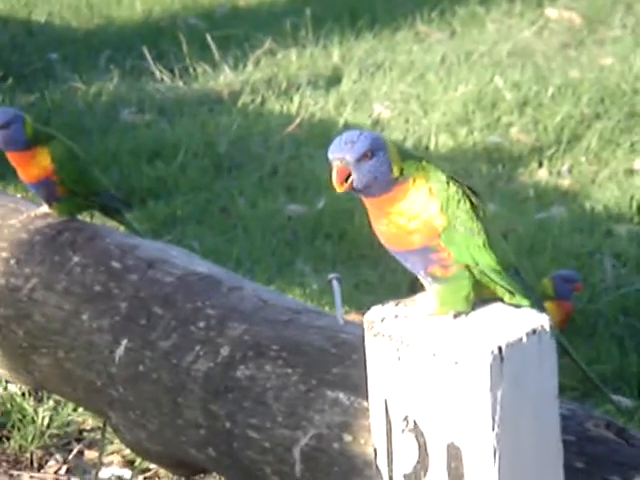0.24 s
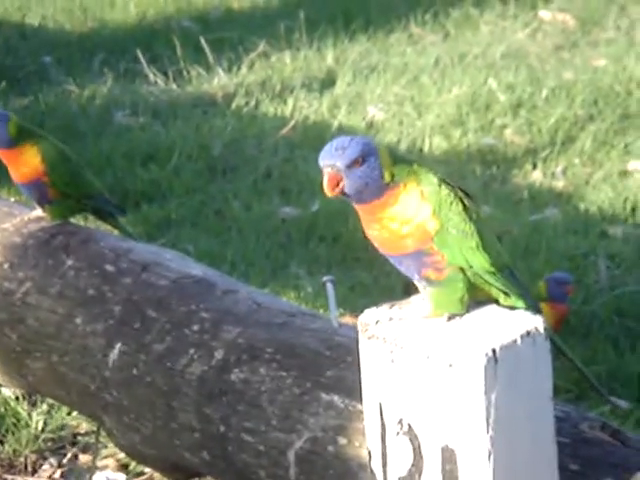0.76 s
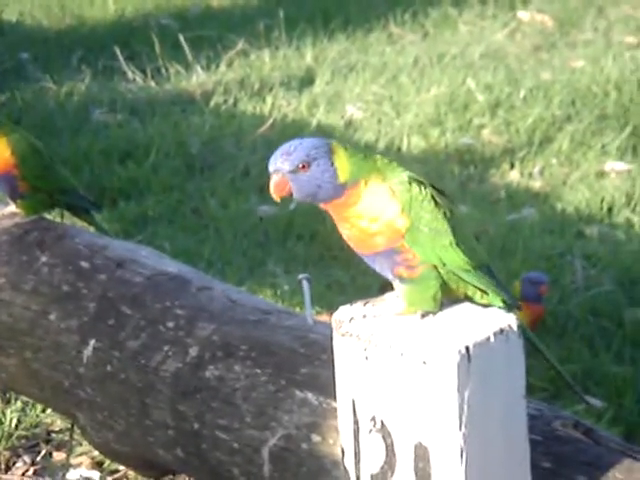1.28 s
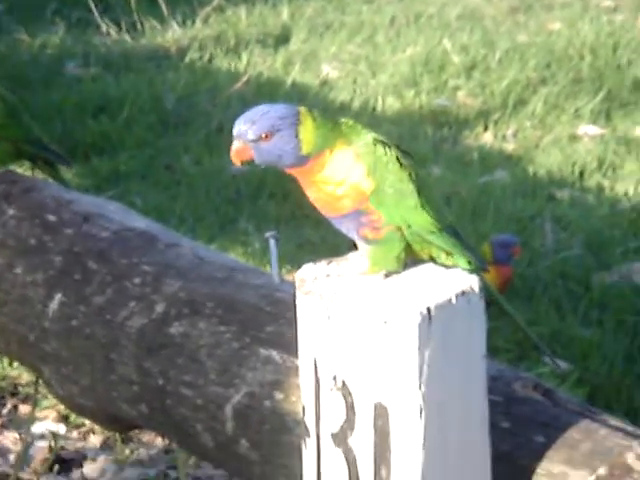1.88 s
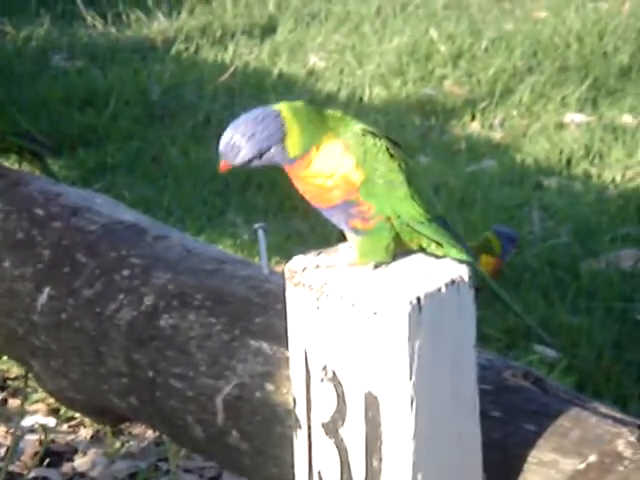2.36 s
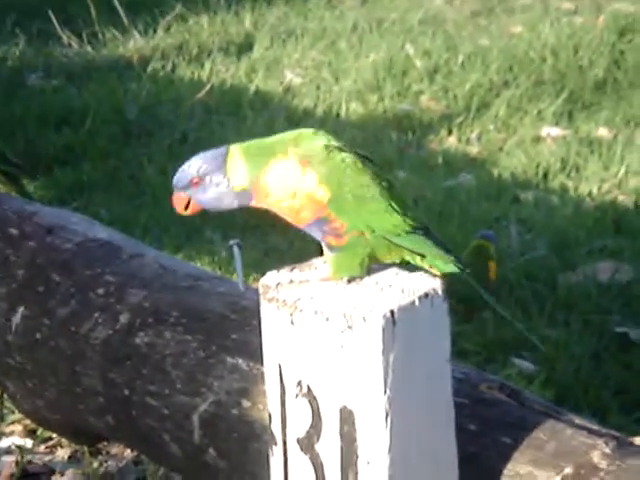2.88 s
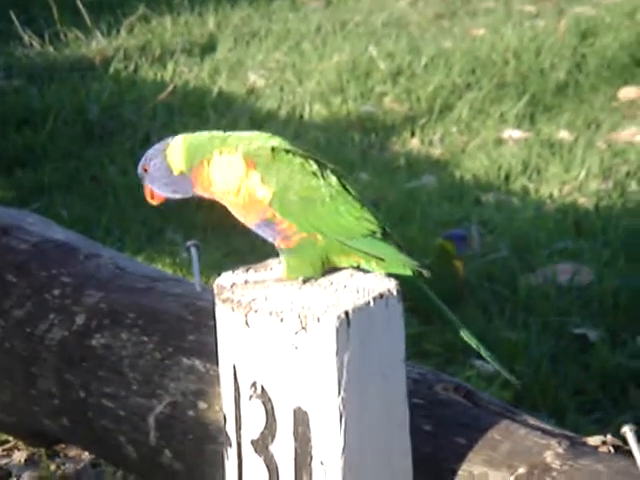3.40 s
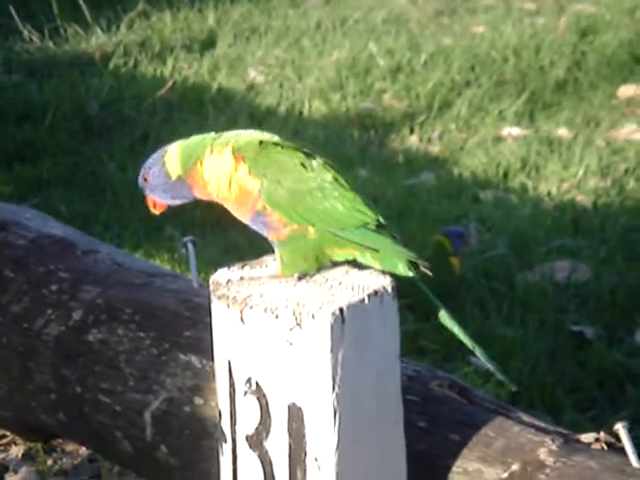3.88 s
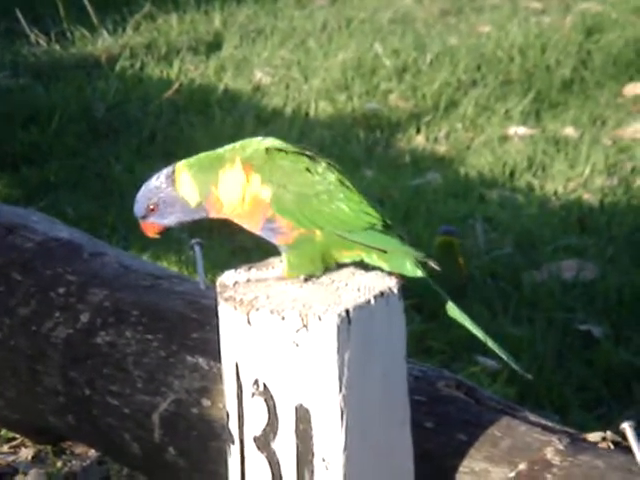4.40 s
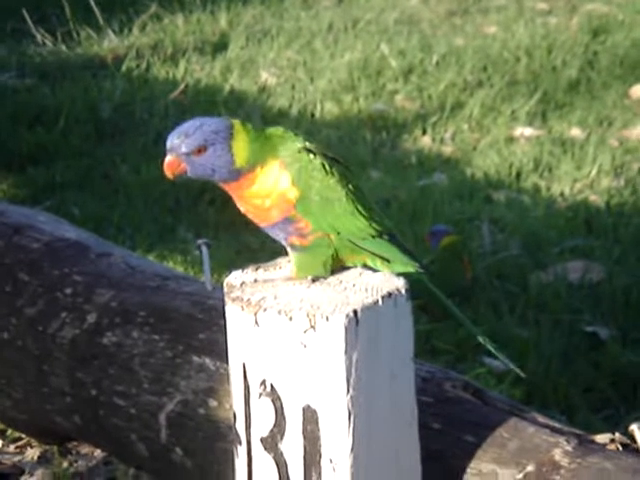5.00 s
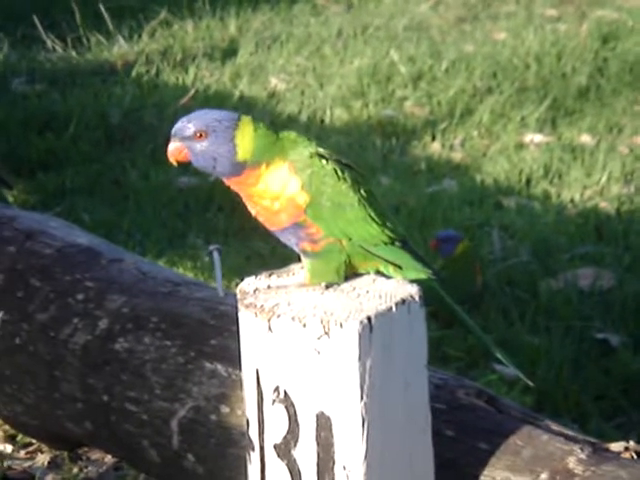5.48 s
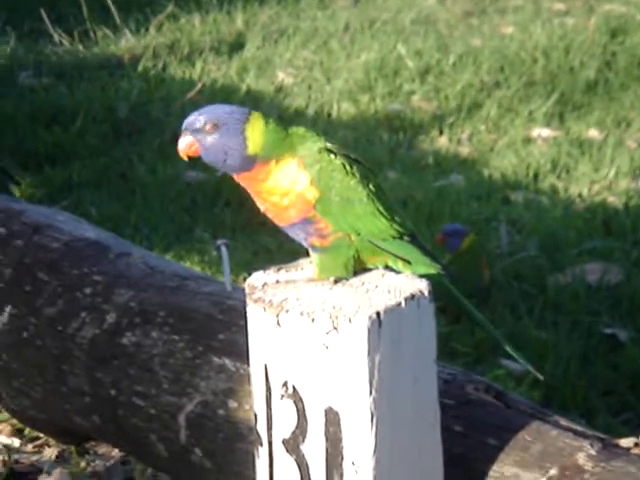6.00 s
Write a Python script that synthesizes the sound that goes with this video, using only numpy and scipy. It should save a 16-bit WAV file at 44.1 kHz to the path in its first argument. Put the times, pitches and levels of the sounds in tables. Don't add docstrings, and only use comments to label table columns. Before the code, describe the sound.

Short shrill parrot screeches repeat close by, pause, then resume, while other birds squawk and whistle further off over a soft traffic rumble.

```python
import sys
import numpy as np
from scipy import signal
from scipy.io import wavfile
from scipy.ndimage import uniform_filter1d, minimum_filter1d, map_coordinates

SR = 44100
rng = np.random.default_rng(int(sys.argv[2]) if len(sys.argv) > 2 else 0)


def nominal_scale(level):
    x = np.asarray(level, float) / 20
    return 10 ** x


def generate_wav(sig):
    pcm = np.round(np.clip(np.atleast_2d(sig).T, -1, 1) * 32767).astype(np.int16)
    wavfile.write(sys.argv[1], SR, pcm)


N = 275625
TOP_HZ = 10300

# start_s, length_s, pitch after the climb_hz, midway_hz, at the end_hz
SHRIEKS = [(0.07, 0.083, 2763, 2680, 2770), (0.248, 0.099, 2680, 2550, 2750),
           (0.454, .11, 2666, 2710, 2886), (.714, 0.1, 2680, 2690, 2760), (0.935, 0.11, 2735, 2695, 2805),
           (1.188, 0.088, 2480, 2600, 2920), (2.954, 0.11, 2758, 2830, 2820),
           (3.148, 0.1, 2786, 2710, 2920), (3.336, 0.096, 2810, 2755, 2800),
           (3.556, 0.097, 2730, 2670, 2750), (3.867, 0.098, 2653, 2650, 2685),
           (4.099, 0.12, 2680, 2680, 2610), (4.811, .117, 2716, 2685, 2770)]
# first_db, second_db, third partial_db, flutter_hz, final slip_hz
SHRIEK_VOICES = [(-18, -17.5, -33, 426, -75), (-18.5, -18.5, -32, 382, -1), (-17.5, -19.5, -36, 385, -32),
                 (-17.5, -20.5, -34, 430, -260), (-18, -20.5, -32.5, 430, -53),
                 (-16, -26.5, -32, 397, -100), (-20, -18.5, -35.5, 170, -33), (-22, -18, -36.5, 407, -58),
                 (-26.5, -19, -35, 180, 18.5), (-19.5, -18.5, -31, 428, -35), (-20, -21, -32, 190, 76),
                 (-17.5, -22, -30.5, 760, 220), (-18.5, -17.5, -31, 350, 60)]
# flutter_db, rasp_db
SHRIEK_ROUGHNESS = [(-18, -10), (-8, -10), (-24, -10), (-20, -10), (-14, -10), (-11, -11), (-26, -11),
                    (-13, -10), (-24, -10), (-17, -9), (-26, -13), (-26, -14), (-22, -12)]
# start_hz, climb strength_db, share of the last rise done late in the hold
SHRIEK_MANNERS = [(1850, 0.5, 0.47), (1876, -0.5, 0.71), (1720, -2.5, 0.53), (1880, -2.5, 0.31),
                  (1740, -4, 0.26), (2020, -6, 0.61), (1734, -0.5, 0.26), (1850, 1, 0.4), (1774, 0, 0.83),
                  (1674, -0.5, 0.48), (1920, -0.5, 0.54), (1780, -4, .2), (1713, -0.5, 0.46)]
# after start_s, share of the pitch climb, first_db, second_db, third partial_db
CLIMB = [(0, 0, -44, -48, -60), (.009, .2, -33, -32, -38), (.015, .5, -27, -24, -37),
         (.021, .82, -27, -19, -37)]
# pitch_hz, first_db, second partial_db
THROAT = [(2500, -10, 0), (2733, 3.5, -0.5), (2731, 2.5, -1), (2810, -1.5, 3.5), (2890, 0, 2)]
# upper_db, lower_db, rasp_db, rasp half width_hz, rasp centre_hz
SIDE_TONES = [(-7, -20, -15, 240, 110), (-3, 0, 1, 580, -80), (-3, 3, 2, 560, -60), (0, 0, 0, 500, 0)]
# start_s, peak_db, pitch_hz, t60_s
BEAK_TICKS = [
    (.891, -14.5, 1230, 0.0068),
    (2.24, -18.5, 650, 0.0079),
    (1.3, -40, 2560, 0.0044),
]
# delay_s, level_db
GROUND_ECHOES = [(.0024, -27.5), (.0047, -19), (.0085, -32.5)]
# start_s, length_s, level_db, overtone step_db
CLUCKS = [
    (0.238, .022, -35.5, -2),
    (2.956, .009, -31.5, 3.5),
    (3.328, 0.0224, -38, .5),
]
# start_s, length_s, start_hz, end_hz, level_db, overtone step_db
LINGERING_SHRIEK = (.001, .072, 2747, 2795, -50.5, 7.5)
# start_s, length_s, start_hz, end_hz, level_db
SQUAWKS = [(1.499, 0.083, 2070, 2113, -44.5), (1.548, 0.059, 2120, 2290, -41),
           (1.619, .022, 3520, 3494, -30.5), (1.632, .016, 3440, 2840, -30), (1.64, 0.017, 2240, 2380, -30),
           (1.652, 0.017, 2500, 2630, -30.5), (2.053, 0.072, 2390, 2400, -49.5),
           (2.148, 0.035, 2450, 2460, -48.5), (2.49, 0.12, 2806, 2650, -49.5),
           (5.041, 0.057, 2680, 2520, -45.5), (5.107, 0.016, 2590, 3330, -41),
           (5.769, 0.067, 2930, 2890, -49), (5.857, 0.1, 1150, 904, -42.5), (1.884, 0.13, 2760, 2760, -55),
           (2.1, 0.051, 3170, 2890, -54), (1.887, 0.057, 2500, 2440, -55), (3.384, 0.076, 2220, 2510, -46),
           (4.985, .027, 2080, 3000, -52), (3.05, 0.17, 3700, 3530, -57.5)]
# start_s, length_s, start_hz, end_hz, level_db
WHISTLES = [(1.532, 0.075, 4620, 4200, -49), (1.554, 0.08, 3900, 4040, -45), (1.68, 0.068, 4130, 4480, -55),
            (1.93, 0.026, 4500, 4600, -49), (2.171, 0.068, 3600, 3940, -45),
            (2.218, 0.035, 4610, 4570, -43.5), (2.479, .12, 4270, 3920, -52.5),
            (2.703, 0.12, 5700, 6150, -57.5), (2.83, .1, 3970, 4370, -63), (3.494, 0.029, 3200, 3800, -53),
            (4.996, 0.042, 4320, 4180, -45), (5.028, 0.013, 3450, 3430, -42),
            (5.05, 0.055, 3150, 3190, -46.5), (5.08, 0.079, 4350, 4250, -44),
            (5.085, 0.052, 3650, 3380, -39.5), (5.126, 0.027, 3920, 4070, -39),
            (5.492, 0.082, 4170, 4300, -47.5), (5.55, .087, 3890, 4150, -46), (5.602, .09, 4400, 4730, -45),
            (5.672, 0.13, 4170, 4040, -41.5), (5.68, 0.058, 5850, 6400, -50),
            (5.765, 0.039, 5650, 6150, -48), (5.89, .06, 2720, 2570, -37.5), (5.932, .077, 2560, 2360, -38)]
# start_s, length_s, level_db
COOS = [(0.151, 0.091, -53.5), (1.41, 0.07, -49.5), (1.7, .063, -53), (2.271, 0.046, -45),
        (5.588, 0.038, -49)]
# start_s, length_s, level_db
PEEPS = [(1.358, 0.18, -57), (1.62, 0.27, -55), (1.898, 0.14, -53), (2.28, 0.065, -54.5),
         (4.245, 0.16, -64), (5.154, 0.22, -51)]
# start_s, length_s, start_hz, end_hz, level_db, overtone step_db
CROAKS = [
    (5.705, 0.043, 1566, 1525, -37, -10),
    (5.815, 0.22, 1572, 1445, -39.5, -13),
]
# peak_s, over its rest_db
FLOCK_SWELLS = [(.31, 7), (1.1, 6.5), (1.481, 6), (1.98, 3.5), (2.45, 0), (2.95, -2), (3.1, 12),
                (3.479, 14), (3.95, 7.5), (4.398, 5), (5.02, 13), (5.71, 15.5), (5.87, 14), (6.05, 8)]
# frequency_hz, level_db
FLOCK_COLOUR = [(1800, -26.5), (2500, 3.5), (3200, 6), (4200, -2), (5000, -7.5), (6500, -8), (8000, -15),
                (10300, -24.5)]
# frequency_hz, level_db
TRAFFIC_COLOUR = [(40, -40), (80, -11), (180, -4.5), (400, -4), (900, -2), (1600, -9), (2200, -9.5),
                  (4200, -12.5), (6000, -17.5), (8000, -28.5), (10500, -17)]
# frequency_hz, level_db
HISS_COLOUR = [(1500, -20), (5000, -12), (8500, -38), (9500, 2), (9950, 51.5), (10300, -15)]


def unit(x):
    return x / np.sqrt(np.mean(np.abs(x) ** 2) + 1e-20)


def tremor(size, hz):
    knots = rng.standard_normal((2, 400))
    place = np.arange(size) * 2 * hz / SR
    swell, shake = (map_coordinates(k, [place], mode="wrap") for k in knots)
    return unit(swell + 1j * shake)


def shrieks():
    out = np.zeros(N)
    tables = zip(SHRIEKS, SHRIEK_VOICES, SHRIEK_ROUGHNESS, SHRIEK_MANNERS)
    for shriek, (*held_db, flutter_hz, slip_hz), (flutter_db, rasp_db), manner in tables:
        s, pitch, levels = outline(shriek, held_db, slip_hz, manner)
        at = np.arange(int(s[0] * SR), int(s[-1] * SR))
        count = len(at)
        pitch = uniform_filter1d(np.interp(at / SR, s, pitch), size=150)
        pitch *= 1 + .004 * tremor(count, 45).real
        phase = 2 * np.pi * np.cumsum(pitch) / SR
        levels.append(levels[2] - 1.0)

        drift = 1 + .03 * tremor(count, 25).real
        flutter = np.exp(2j * np.pi * np.cumsum(flutter_hz * drift) / SR)
        flutter *= nominal_scale(flutter_db + 3.5 * tremor(count, 45).real)
        bursts = unit(nominal_scale(7 * tremor(count, 70).real))
        bursts *= np.linspace(1.3, .8, count)
        sweep = np.abs(np.gradient(pitch)) * SR / 40000

        for k, (db, (up_db, down_db, noise_db, wide_hz, centre_hz)) in enumerate(zip(levels, SIDE_TONES), 1):
            size = np.interp(at / SR, s, nominal_scale(db / 2)) ** 2 * (k * pitch < TOP_HZ)
            size *= nominal_scale(.7 * k * tremor(count, 25.5).real)
            shake = nominal_scale(up_db) * flutter
            shake += nominal_scale(down_db) * np.exp(2j * np.pi / 3) * np.conj(flutter)
            rasp = bursts * tremor(count, wide_hz) * np.exp(2j * np.pi * centre_hz * at / SR)
            shake += nominal_scale(rasp_db + noise_db) * rasp
            shake += (0.53 + 0.13 * k) * sweep * tremor(count, 150)
            shake += nominal_scale(-41.5 + 16 * sweep) * tremor(count, 1400)
            out[at] += np.sqrt(2) * size * np.real((1 + shake) * np.exp(1j * k * phase))
    return out


def outline(shriek, held_db, slip_hz, manner):
    s0, length, held_hz, mid_hz, end_hz = shriek
    start_hz, climb_db, late_rise = manner
    climb = [(s0 + s, start_hz + share * (held_hz - start_hz), *np.add(db, climb_db))
             for s, share, *db in CLIMB]
    top, end = s0 + .029, s0 + length
    close = end - 0.0039 - .045 * abs(slip_hz) / 1e3
    late_hz = mid_hz + late_rise * (end_hz - mid_hz)
    hold = np.array([
        (top, held_hz, -2, 0, -10),
        (top + .45 * (close - top), mid_hz, 0, 0, 0),
        (top + .78 * (close - top), late_hz, 0, 0, 0),
        (close, end_hz, -2, -1, -4),
        (end, end_hz + slip_hz, -3.5, -2, -10.5),
        (end + 0.0045, end_hz + 1.3 * slip_hz, -30, -30, -30)])
    hz, *favour_db = np.transpose(THROAT)
    hold[:, 2:] += held_db
    hold[:, 2:4] += np.transpose([np.interp(hold[:, 1], hz, db) for db in favour_db])
    s, pitch, *levels = np.vstack([climb, hold]).T
    return s, pitch, levels


def beak_ticks():
    out, t = np.zeros(N), np.arange(SR // 20) / SR
    for s, db, hz, t60 in BEAK_TICKS:
        fade_db = -60 * t / t60
        ring = np.sin(2 * np.pi * hz * t)
        ring += np.sin(2 * np.pi * 2.25 * hz * t) * nominal_scale(fade_db)
        out[int(s * SR):][:len(t)] += nominal_scale(db + 0.5 + fade_db) * ring * (1 - np.exp(-t / 0.00043))
    return out


def notes(table, rasp, rasp_hz):
    out = np.zeros(N)
    for s, length, hz0, hz1, db, step_db in table:
        u = np.linspace(0, 1, int(length * SR))
        pitch = hz0 + (hz1 - hz0) * (3 - 2 * u) * u ** 2
        pitch *= 1 + .008 * tremor(len(u), 40).real
        phase = 2 * np.pi * np.cumsum(pitch) / SR
        blur = rasp * np.clip((-36 - db) / 10, .25, 1)
        size = np.sqrt(2) * nominal_scale(db) * np.sin(np.pi * u) ** 0.5
        size = size * (1 + blur * tremor(len(u), rasp_hz))
        third_db = -1.6 * abs(step_db) - 1.5
        steps = [0, step_db, third_db, third_db - 8]
        tone = sum(nominal_scale(d) * (k * pitch < TOP_HZ) * np.exp(1j * k * phase) for k, d in enumerate(steps, 1))
        out[int(s * SR):][:len(u)] += np.real(size * tone)
    return out


def lesser_calls():
    coo_hz, peep_hz, squawk_step_db, whistle_step_db = 1750, 4250, -7.5, -20.5
    rows = [(s, length, 870, 1102, db, step) for s, length, db, step in CLUCKS]
    rows += [LINGERING_SHRIEK]
    rows += [(s, length, coo_hz, coo_hz, db, whistle_step_db) for s, length, db in COOS]
    rows += [(s, length, peep_hz, peep_hz, db, whistle_step_db) for s, length, db in PEEPS]
    rows += [(*row, squawk_step_db) for row in SQUAWKS]
    rows += [(*row, whistle_step_db) for row in WHISTLES]
    return notes(rows, rasp=.9, rasp_hz=120) + notes(CROAKS, rasp=4, rasp_hz=200)


def trees(x):
    gap_s, t60_s, level_db = .028, 1.2, -19.5
    t = np.arange(SR) / SR
    decay = nominal_scale(-60 * t / t60_s) + 1.4 * nominal_scale(-60 * t / 0.56)
    lumps = nominal_scale(2.2 * tremor(SR, 45).real)
    tail = rng.standard_normal(SR) * decay * lumps * (t > gap_s)
    tail = signal.lfilter([1, -.75], 1, tail)
    wet = signal.fftconvolve(x, tail / np.linalg.norm(tail))[:N]
    stir = np.abs(1 + .55 * tremor(N, 75))
    return nominal_scale(level_db + 3) * stir * wet


def twitter(count):
    when, long, pick, off, glide, size = rng.random((count, 6)).T
    favourites_hz = np.array([2500, 2750, 3150, 3900, 4200, 4300, 4650, 5900])
    hz = favourites_hz[(pick * 8).astype(int)] * (.97 + .06 * off)
    start_s, length_s = when * (N / SR - .15), 0.0219 + .05 * long
    end_hz = hz * (.95 + 0.19 * glide)
    rows = np.transpose([start_s, length_s, hz, end_hz, 9 * size - 70, np.full(count, -14.0)])
    return unit(notes(rows, rasp=0.88, rasp_hz=117))


def coloured(points, patchy_db, hz_span, s_span):
    hz, t, z = signal.stft(rng.standard_normal(N), SR, nperseg=512)
    field = uniform_filter1d(rng.standard_normal(z.shape), max(1, int(hz_span / hz[1])), 0)
    field = uniform_filter1d(field, max(1, int(s_span / t[1])), 1)
    f, db = np.transpose(points)
    shape_db = np.interp(np.log(hz + 1), np.log(f), db, left=-120, right=-120)
    gain = nominal_scale(shape_db[:, None] + patchy_db * unit(field))
    return unit(signal.istft(z * gain, SR, nperseg=512)[1][:N])


def gain_control():
    depth_db, duck_s, recover_s, step_s = 12.5, 0.17, 1.01, .001
    times = np.arange(0, N / SR, step_s)
    loud = sum((times > s) & (times < s + length) for s, length, *_ in SHRIEKS)
    state = [0.96]
    for on in loud[1:]:
        push = on * (1 - state[-1]) / duck_s
        state.append(state[-1] + step_s * (push - state[-1] / recover_s))
    return -depth_db * np.interp(np.arange(N) / SR, times, state)


def background():
    t, gain_db = np.arange(N) / SR, gain_control()
    swells = [db * np.clip(1 - np.abs(t - s) / 0.3, 0, 1) for s, db in FLOCK_SWELLS]
    swell_db = np.max(swells, axis=0)
    traffic = coloured(TRAFFIC_COLOUR, patchy_db=1.2, hz_span=500, s_span=0.11)
    traffic = nominal_scale(-38.5 + gain_db) * traffic
    chirps = twitter(count=300)
    blur = nominal_scale(-1.5) * coloured(FLOCK_COLOUR, patchy_db=4, hz_span=190, s_span=.06)
    flock = blur + nominal_scale(-6) * (chirps + 11 * trees(chirps))
    flock = nominal_scale(-51.5 + gain_db / 2 + swell_db) * flock
    hiss = nominal_scale(-58) * coloured(HISS_COLOUR, patchy_db=1.5, hz_span=500, s_span=.08)
    return traffic + flock + hiss


def scene():
    far = lesser_calls()
    near = shrieks()
    near = near + sum(nominal_scale(db) * np.roll(near, int(s * SR)) for s, db in GROUND_ECHOES)
    echoes = trees(near + 2.3 * far)
    return (near + far + beak_ticks() + echoes + background())[None]


def starve(x, depth_db, above_hz):
    hz, t, z = signal.stft(x, SR, nperseg=512, noverlap=384)
    bands = 10 * np.log10(uniform_filter1d(np.abs(z) ** 2, size=7, axis=0).clip(1e-20))
    peak = bands.max(0)
    loudest = -minimum_filter1d(-peak, size=11, origin=-2)
    jump = loudest - peak
    margin_db = bands + 9 * (hz[:, None] > 8800) - loudest + depth_db - .95 * jump
    keep = 1 / (1 + np.exp(-margin_db / 1.5))
    keep = np.where(hz[:, None] > above_hz, keep, 1)
    return signal.istft(z * keep, SR, nperseg=512, noverlap=384)[1][:N]


def top_cut(x):
    return signal.sosfilt(signal.butter(12, 10700, fs=SR, output="sos"), x)


def record(dry):
    x = dry[0] / (1 + np.abs(dry[0] / .7) ** 4) ** .25
    steep = signal.cheby2(12, 60, TOP_HZ + 500, fs=SR, output="sos")
    bass = signal.butter(2, 75, "highpass", fs=SR, output="sos")
    x = signal.sosfilt(np.vstack([steep, bass]), x)
    mix = starve(x, depth_db=50.0, above_hz=2630)[None]
    return top_cut(mix)


dry = scene()
out = record(dry)
generate_wav(out)
```